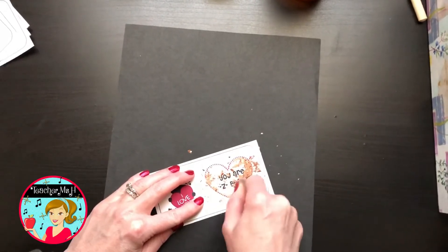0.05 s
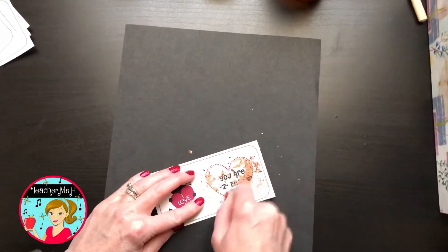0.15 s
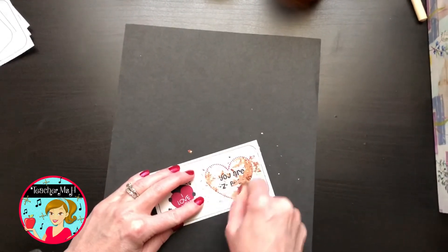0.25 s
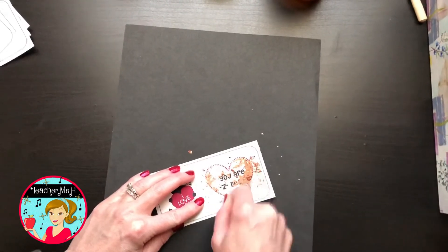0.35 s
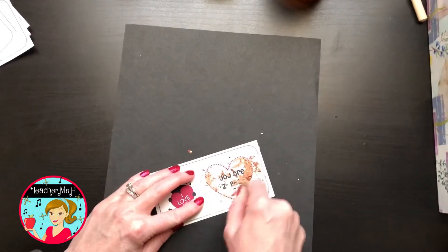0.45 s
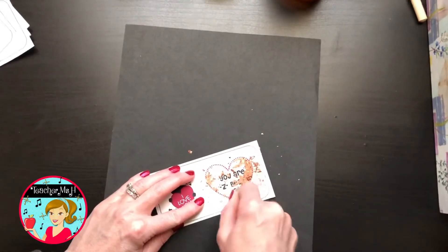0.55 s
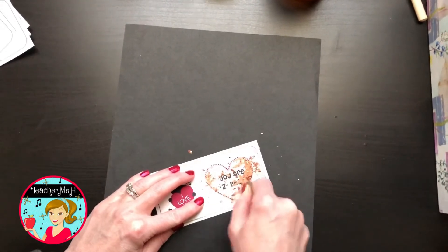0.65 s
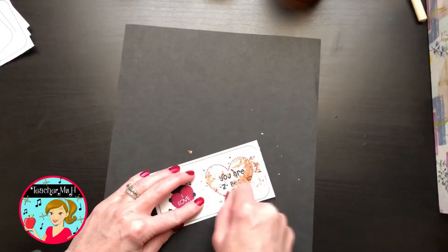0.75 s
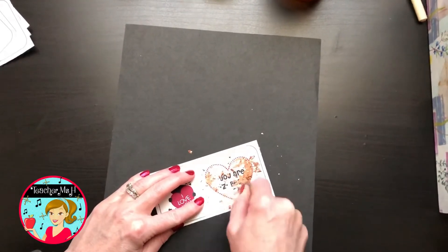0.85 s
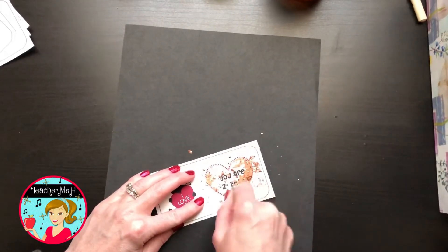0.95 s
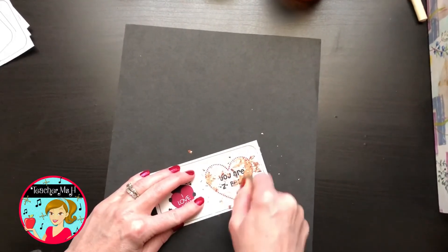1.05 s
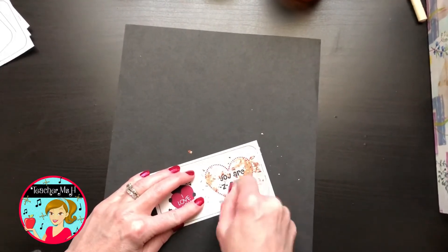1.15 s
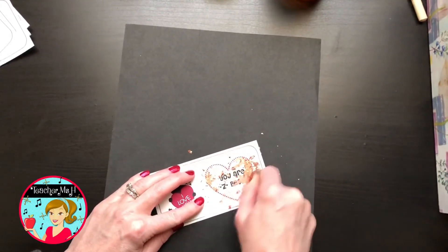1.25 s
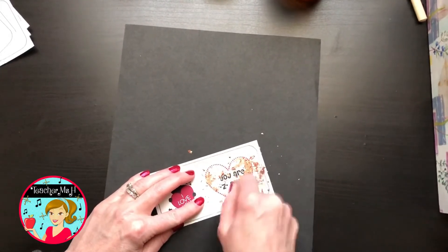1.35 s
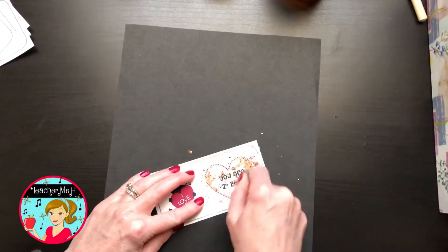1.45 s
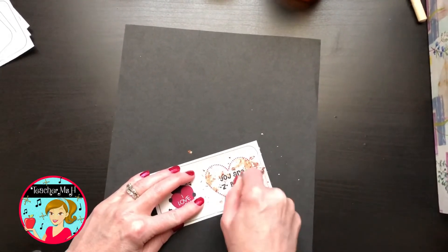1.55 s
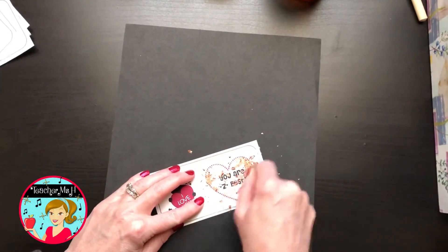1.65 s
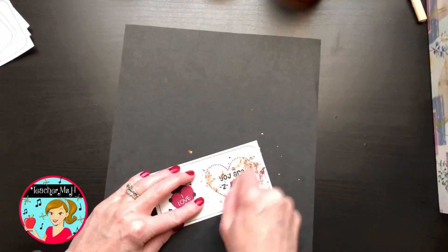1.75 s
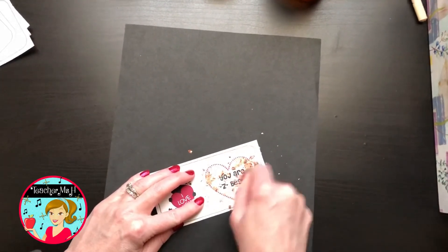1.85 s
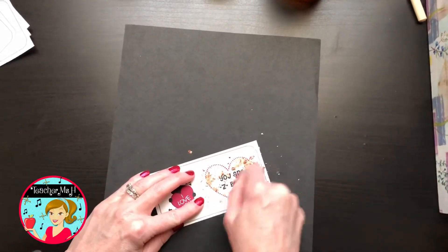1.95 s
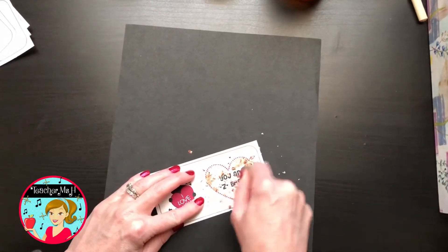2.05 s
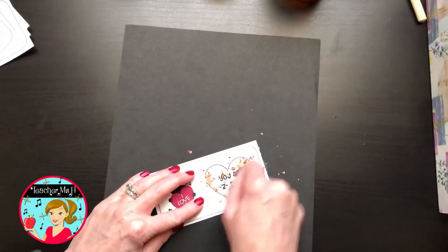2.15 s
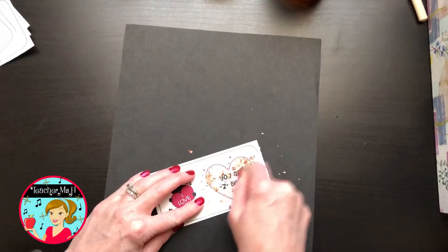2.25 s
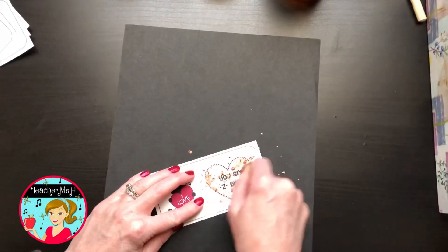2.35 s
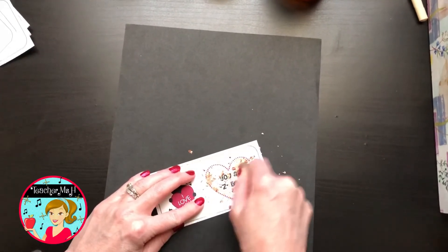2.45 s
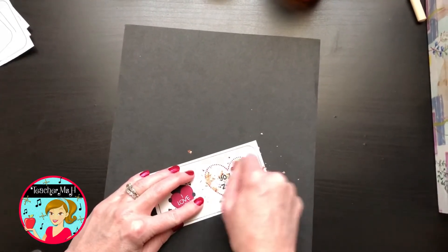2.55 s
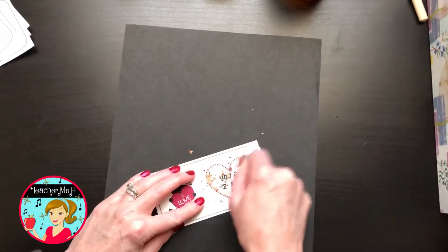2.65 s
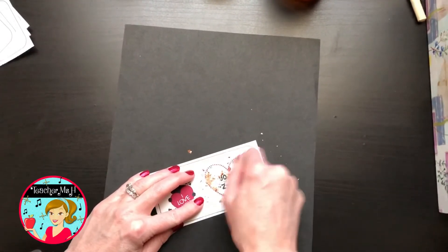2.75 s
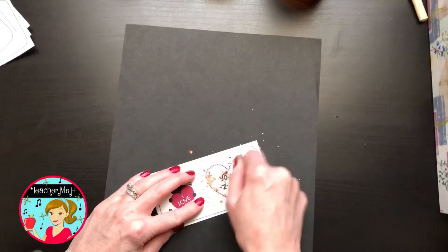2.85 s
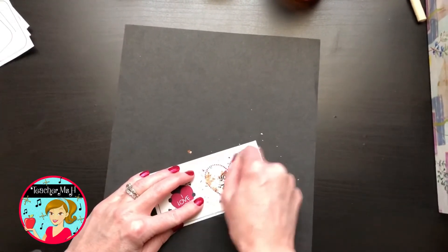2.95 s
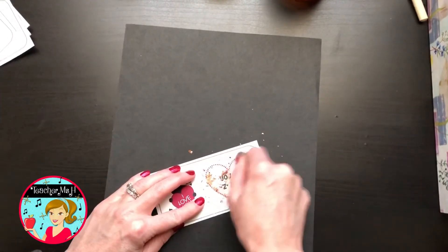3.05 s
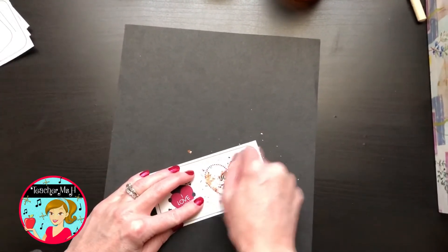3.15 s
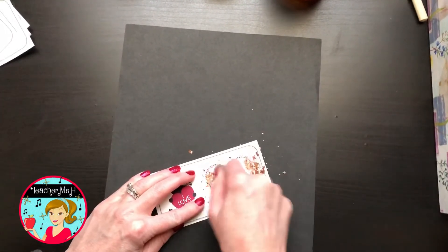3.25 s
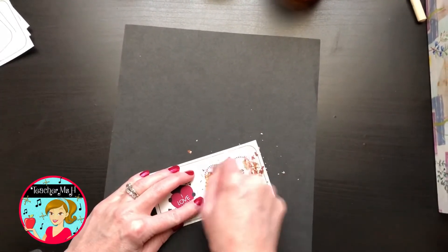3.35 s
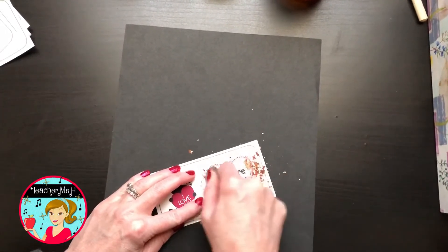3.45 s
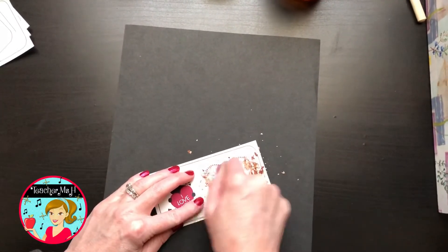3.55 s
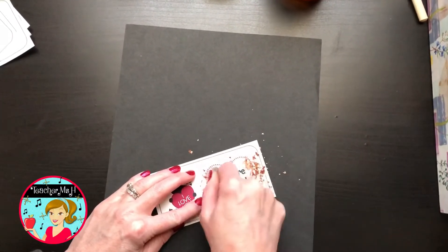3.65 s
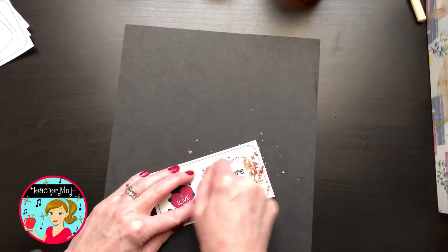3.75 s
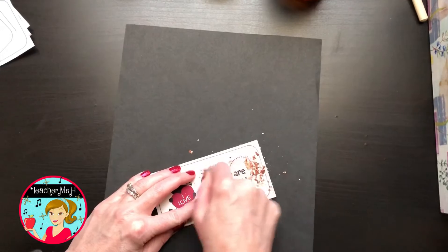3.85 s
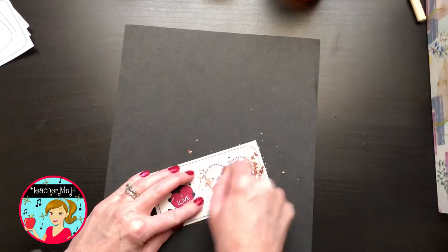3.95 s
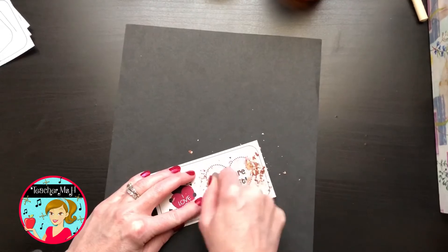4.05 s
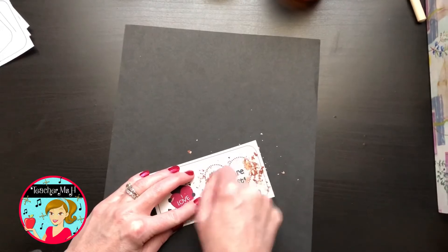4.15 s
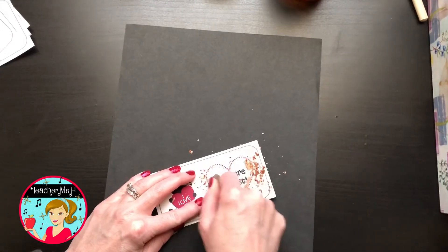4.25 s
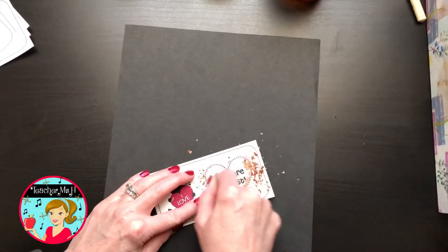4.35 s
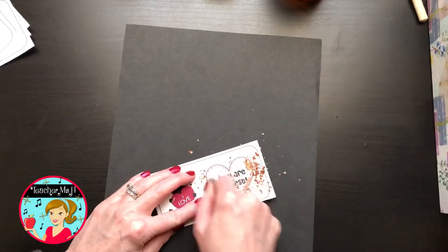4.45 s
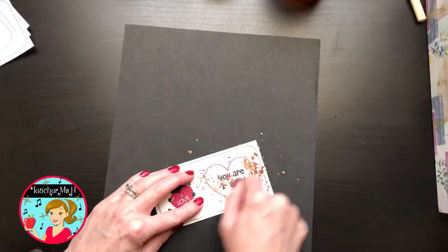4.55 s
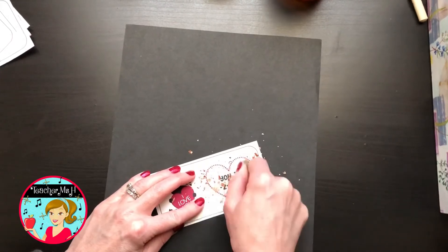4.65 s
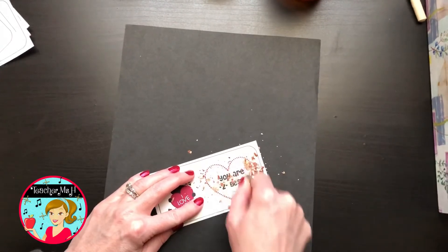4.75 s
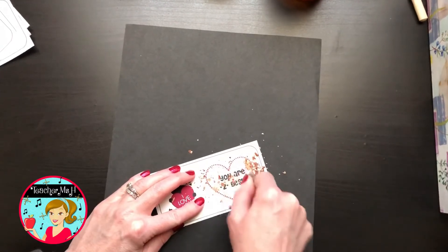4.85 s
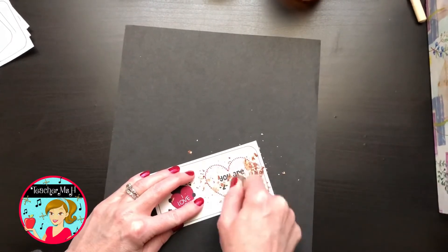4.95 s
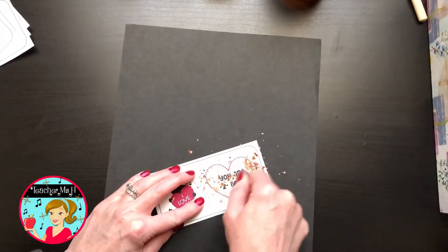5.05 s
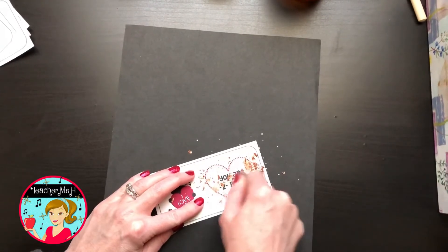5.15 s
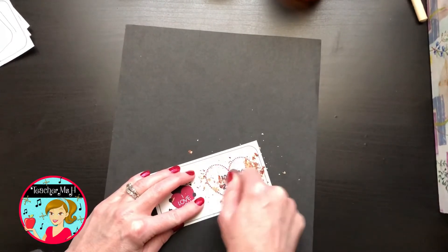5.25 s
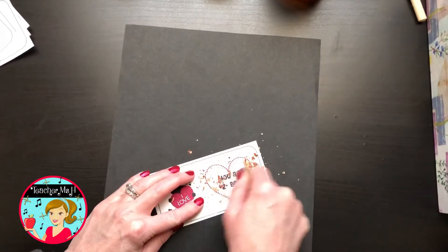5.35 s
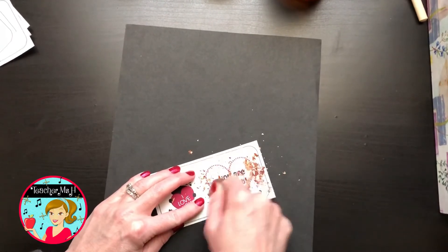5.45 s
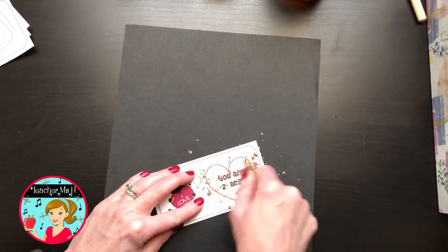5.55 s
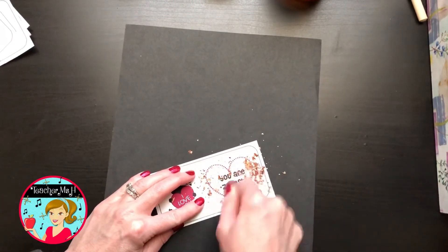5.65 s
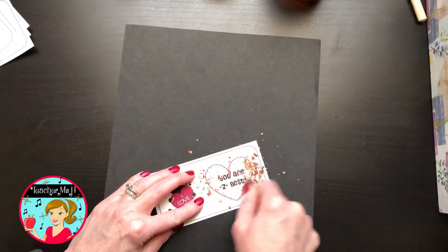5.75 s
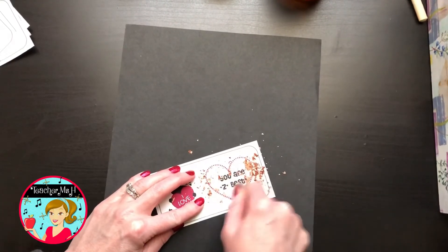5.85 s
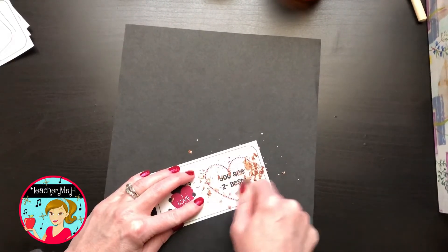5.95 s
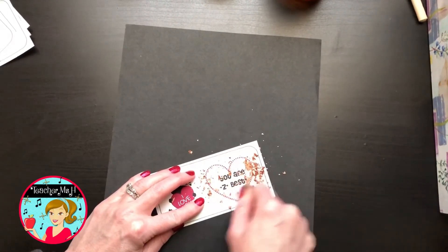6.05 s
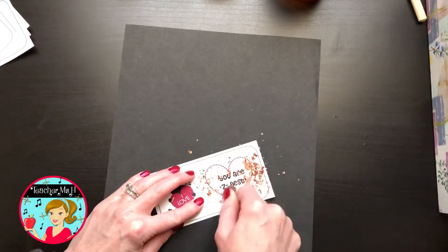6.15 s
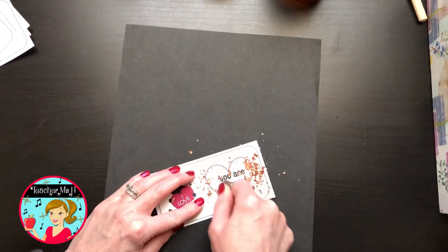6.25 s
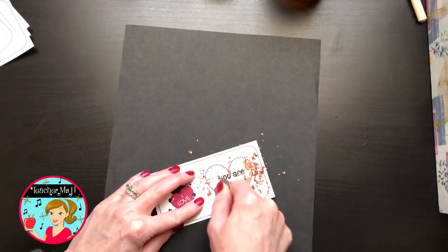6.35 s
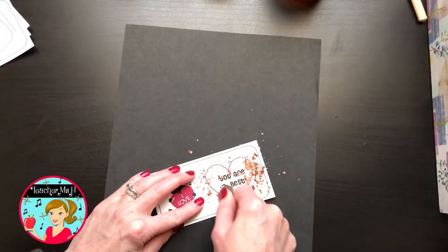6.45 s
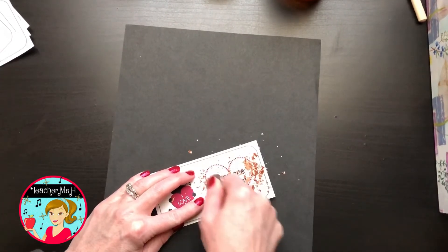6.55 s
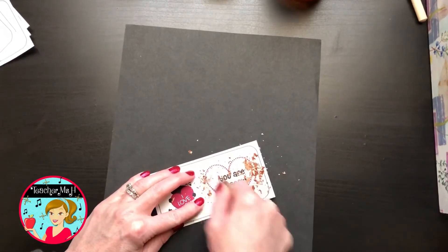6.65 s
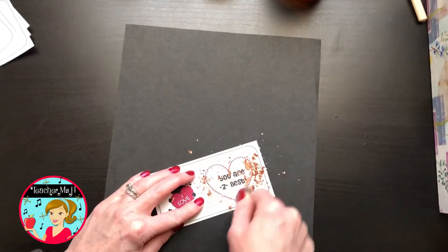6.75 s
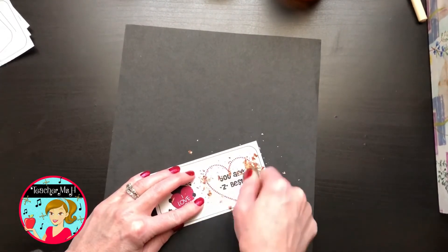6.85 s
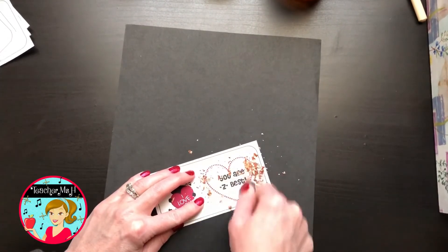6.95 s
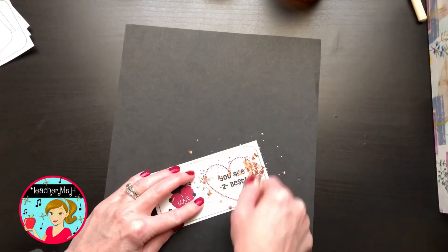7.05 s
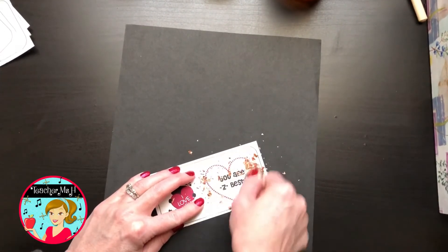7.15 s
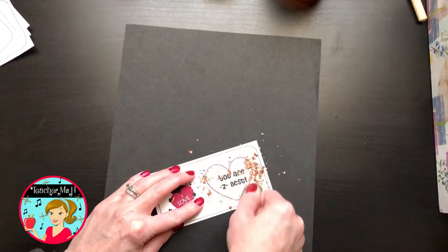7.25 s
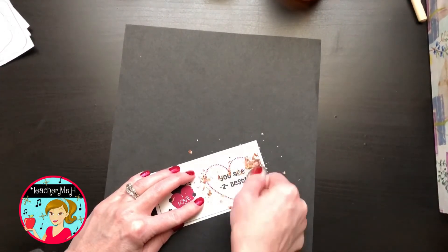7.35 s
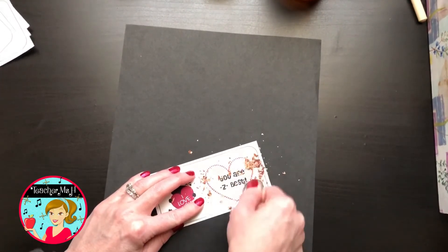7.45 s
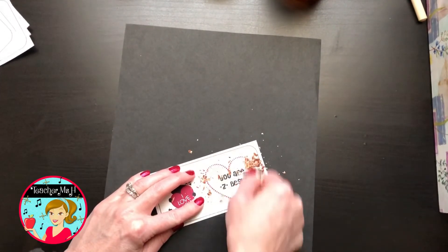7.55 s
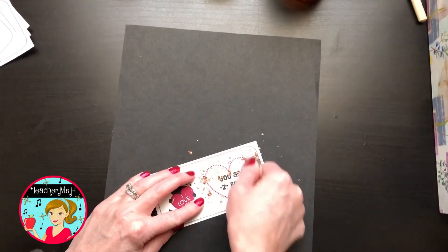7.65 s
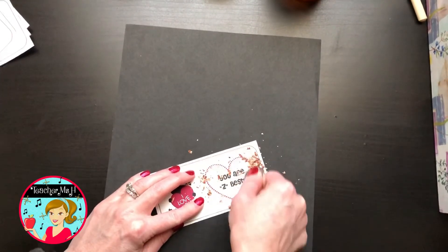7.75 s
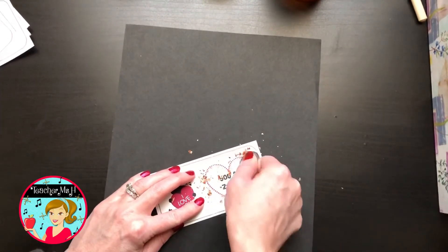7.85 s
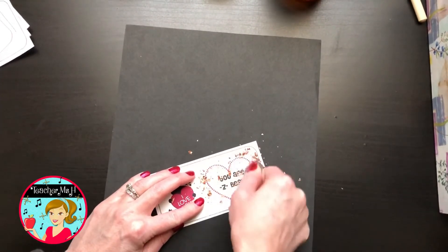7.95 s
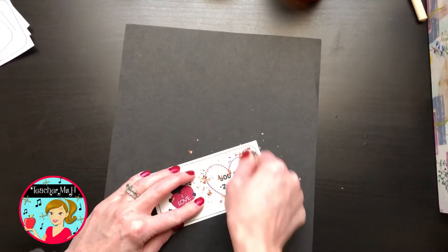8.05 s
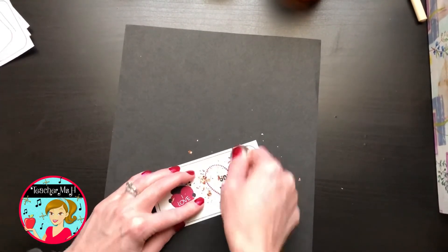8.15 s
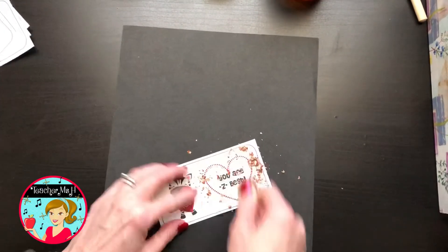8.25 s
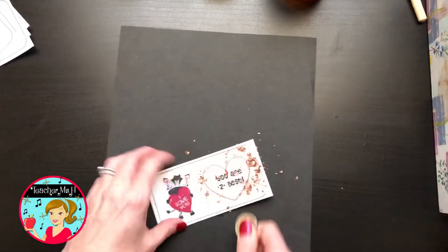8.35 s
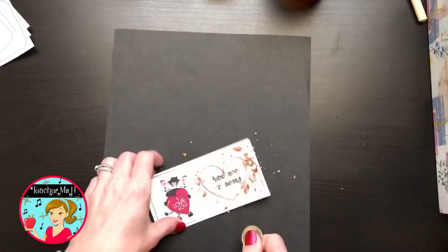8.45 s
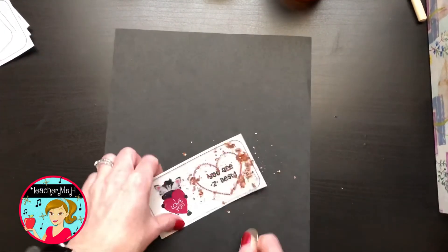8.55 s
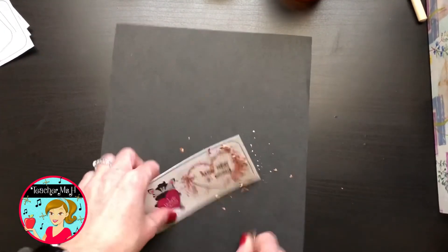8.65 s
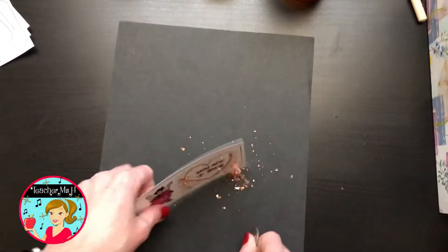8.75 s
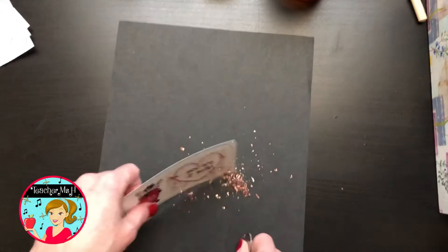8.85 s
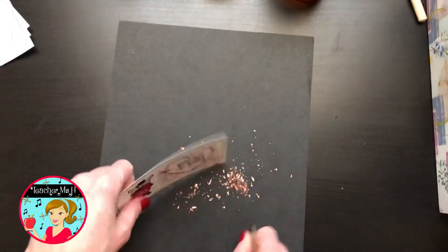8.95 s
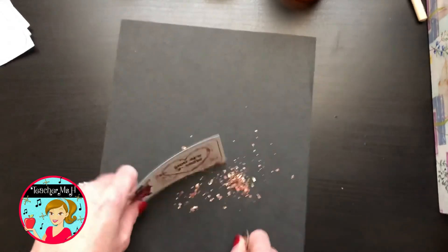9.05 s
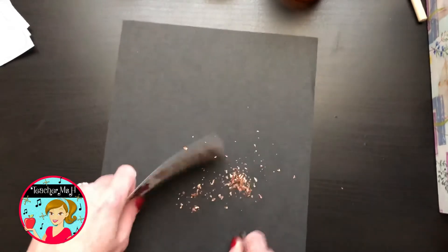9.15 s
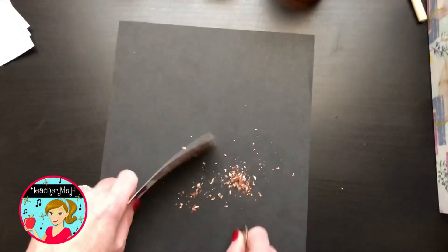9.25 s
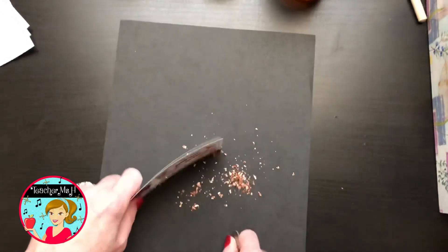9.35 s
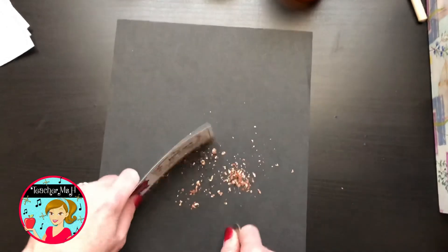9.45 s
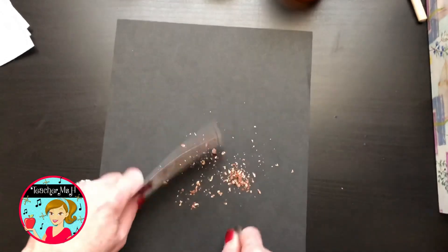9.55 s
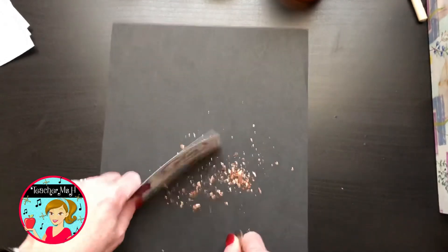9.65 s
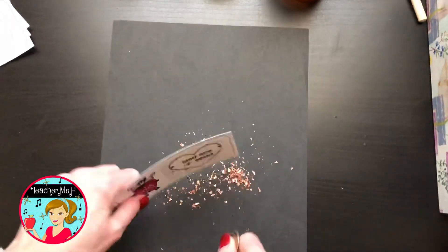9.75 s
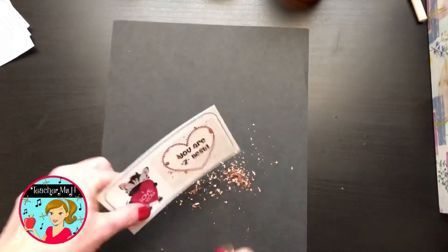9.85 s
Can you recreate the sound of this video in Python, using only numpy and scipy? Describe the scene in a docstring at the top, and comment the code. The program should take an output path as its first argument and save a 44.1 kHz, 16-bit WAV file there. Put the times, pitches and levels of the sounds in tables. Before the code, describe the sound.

Close up in a small quiet room, a coin rubs dried paint off a stiff paper card on a wooden desk, about nine raspy strokes a second, uneven and catching. The strokes grow softer and patchier, with dull hand thuds. Then the card slides up with a crackling hiss, its edge knocks the desk five times while crumbs patter, and one crisp flick follows before light sliding.

```python
"""A coin rubs dried paint off a paper card on a wooden desk, about nine strokes a second, catching on flakes.
Each stroke is filtered noise: a rasp in the card, a thump in the desk and fine grit at the coin's edge.
The card then slides up off the desk, a rub and a crackling hiss, and its edge is knocked on the desk five times
while crumbs of paint trickle off; it gets one last sharp flick, and a little more sliding follows.
A small room answers with a short noise tail, over steady air noise and a low hum."""
import sys
import numpy as np
from scipy import signal
from scipy.fft import rfft, irfft, next_fast_len
from scipy.io import wavfile
from scipy.ndimage import map_coordinates

SR = 44100
rng = np.random.default_rng(int(sys.argv[2]) if len(sys.argv) > 2 else 0)


def transcribe(u):
    """Save the signal u as a 16-bit wav file named by the first command-line argument.

    u: samples, shape (n,) or (channels, n), limited to [-1, 1]; the rate is SR.
    q: integer samples, one column per channel.
    """
    v = np.clip(np.atleast_2d(u).T, -1, 1)
    q = np.round(v * 32767).astype(np.int16)
    wavfile.write(sys.argv[1], SR, q)


N = 436574  # length in samples

# Resonances of the card held flat under the coin. Each row: pitch in Hz, width in Hz, boost in dB.
CARD = [(281, 98, 9.5), (419, 16, 7), (511, 20, 7.5), (634, 56, 10.5), (891, 180, 9.5), (1252, 68, 6.5),
        (1635, 170, 3), (1740, 70, 7.5), (2078, 125, 9.5), (2543, 176, 11), (2932, 146, 11.5),
        (3600, 130, 5), (4410, 300, 0)]
# Tone of the rasp in the card. Each row: frequency in Hz, relative level in dB.
RASP = [(100, -22.5), (190, -4), (270, 0.5), (450, -1.5), (750, -7.5), (1000, -3.5), (1400, -2),
        (1900, -12.5), (2600, -19), (3300, -26.5), (5000, -28), (7000, -49)]
# Tone of fine paint grit and cracks. Each row: frequency in Hz, relative level in dB.
GRIT = [(1500, -32), (3000, -6), (4600, -2), (7000, -6), (10000, -9), (16000, -12.5)]
# Tone of paper hiss and crackle. Each row: frequency in Hz, relative level in dB.
HISS = [(1470, -16), (2500, -4), (3740, -6.5), (4990, -5.5), (8270, -12), (9730, -12), (14800, -12),
        (16000, -19)]


def amp(db):
    """Turn decibels into a plain gain."""
    return 10 ** (np.asarray(db) / 20)


def unit(x):
    """Scale a steady sound to an average (rms) level of 1."""
    return x / np.sqrt(np.mean(x ** 2) + 1e-20)


def unit_energy(x):
    """Scale a short sound to a total energy of 1."""
    return x / np.sqrt(np.sum(x ** 2) + 1e-20)


def seconds(size):
    """Time of each sample."""
    return np.arange(size) / SR


def along(points, hz):
    """Read a curve of (Hz, value) points on a log frequency axis."""
    f, v = np.transpose(points)
    return np.interp(np.log(hz + 1), np.log(f + 1), v)


def add(track, s, x):
    """Mix x into the track from time s on."""
    i = round(s * SR)
    part = x[max(-i, 0):max(len(track) - i, 0)]
    track[max(i, 0):][:len(part)] += part


def colour(x, points, tilt_db=0, modes=()):
    """Filter through (Hz, dB) points, plus a tilt in dB per octave (450-3000 Hz) and (Hz, width, dB) resonances."""
    m = 2 * next_fast_len(len(x) // 2 + 2048)
    hz = np.fft.rfftfreq(m, 1 / SR)
    peaks = sum(db / (1 + (2 * (hz - centre) / width) ** 2) for centre, width, db in modes)
    gain = amp(along(points, hz) + peaks + tilt_db * np.log2(np.clip(hz, 450, 3000)))
    # folding the cepstrum makes the filter answer only after its input, never before
    cepstrum = irfft(np.log(np.maximum(gain / gain.max(), 1e-6)))
    cepstrum[1:m // 2] *= 2
    cepstrum[m // 2 + 1:] = 0
    response = np.exp(rfft(cepstrum))
    return irfft(rfft(x, m) * response)[:len(x)]


def burst(t60, attack):
    """Noise that swells within about attack seconds while it dies by 60 dB in t60 seconds."""
    t = seconds(SR // 4)
    return rng.standard_normal(len(t)) * amp(-60 * t / t60) * (1 - np.exp(-t / attack))


def grains(size, rate, spread_db):
    """Tiny fractures at random times, rate a second, of widely spread size with an upper limit on the spread."""
    hit = rng.random(size) < rate / SR
    return hit * rng.standard_normal(size) * amp(spread_db * np.minimum(rng.standard_normal(size), 2))


def swell(t, rise, fall):
    """Speed of a sliding stroke: a smooth hump with its peak at t = 0."""
    width = np.maximum(np.where(t < 0, rise, fall), .004)
    return np.exp(-(np.abs(t) / width) ** 2.04)


def judder(size, rate, depth_db):
    """Uneven grip: a gain that wanders between random values, rate of them a second."""
    knots = rng.standard_normal(size)[:int(size * rate / SR) + 4]
    wander = map_coordinates(knots, [seconds(size) * rate])
    return unit(amp(depth_db * wander))


def bump(hz, rattle_db):
    """A soft blow rings one damped bending mode, with a little rattle around it."""
    t = seconds(SR // 4)
    ring = unit_energy(np.sin(2 * np.pi * hz * t) * amp(-60 * t / 0.047) * (1 - np.exp(-t / .004)))
    band = [(hz / 4, -22), (hz / 1.35, -5), (hz, 0), (hz * 1.18, -5), (hz * 3, -30), (hz * 12, -70)]
    rattle = unit_energy(colour(burst(t60=0.093, attack=.002), band))
    return ring + amp(rattle_db) * rattle


def shifted(modes):
    """The same resonances, scattered a little in pitch as the coin moves along the card from stroke to stroke."""
    detune = .025  # typical scatter, as a share of the pitch
    modes = np.array(modes, float)
    scatter = rng.standard_normal(len(modes))
    return [(hz * np.exp(detune * z), width, db) for (hz, width, db), z in zip(modes, scatter)]


def background():
    """Room air and a low, narrow hum, both made of steady filtered noise."""
    # Tone of the air noise. Each row: frequency in Hz, relative level in dB.
    air_tone = [(10, -48), (25, -24), (42, -19), (108, 1.5), (166, -8.5), (309, -8), (463, -12.5),
                (911, -15.5), (1650, -20.5), (2100, -24), (2500, -27.5), (3250, -32), (4490, -33),
                (16000, -47.5)]
    # Tone of the hum. Each row: frequency in Hz, relative level in dB.
    hum_tone = [(25, -16.5), (40, -15.5), (51, 8), (63, -24), (78, -12), (105, -1), (125, -8), (160, -25.5),
                (400, -60)]
    air = unit(colour(rng.standard_normal(N), air_tone))
    hum = unit(colour(rng.standard_normal(N), hum_tone))
    return amp(-58.5) * air + amp(-57.5) * hum


def scraping():
    """Each stroke breaks paint grains: a rasp in the card, a thump in the desk and fine grit at the coin's edge."""
    # Coin strokes, to and fro. Each row: time of full speed in seconds, rise in seconds, relative rasp level in dB,
    # bite as rasp tilt in dB per octave (above 0 the edge digs in, below 0 the coin drags flat).
    strokes = [(.07, 0.015, -45, 2.5), (.168, .029, -39, 1.5), (.263, 0.019, -41.5, 2.5),
               (.376, .017, -42, 2), (.468, 0.049, -53.5, 1.5), (.56, .022, -50.5, 3),
               (.652, 0.022, -44, 0.5), (.756, 0.017, -47, 0.5), (.855, 0.022, -47.5, -0.5),
               (.985, 0.034, -45.5, 2), (1.054, .004, -38.5, -4.5), (1.171, 0.023, -38, 3.5),
               (1.268, 0.024, -41, -1.5), (1.373, .027, -45.5, 0), (1.578, 0.032, -39.5, 1.5),
               (1.668, .03, -40, -0.5), (1.797, 0.076, -48.5, 2.5), (1.887, 0.025, -41.5, 0.5),
               (1.991, 0.02, -43, 0.5), (2.1, 0.0097, -40, -4), (2.19, 0.035, -50, 0.5),
               (2.233, .004, -42.5, -2), (2.299, .022, -44, -3.5), (2.41, 0.023, -51.5, 2),
               (2.485, 0.016, -43, -4.5), (2.589, 0.032, -40.5, 1.5), (2.688, 0.024, -38, -1.5),
               (2.809, 0.026, -48.5, 2.5), (2.881, 0.0057, -43, 2), (2.995, .031, -50, 2),
               (3.121, 0.04, -37, -3), (3.215, .021, -49, -0.5), (3.298, 0.02, -40.5, -3),
               (3.42, 0.0055, -40.5, 0), (3.513, 0.018, -45, -5), (3.7, .009, -42, -7),
               (3.832, 0.037, -44, 2), (3.928, 0.039, -40, -1), (4.025, 0.042, -54.5, 2),
               (4.096, 0.013, -41.5, -2), (4.22, .05, -61, 1), (4.326, .04, -55.5, -3.5),
               (4.44, 0.034, -44.5, 2.5), (4.5, 0.041, -51.5, 2.5), (4.555, .03, -54, 1.5),
               (4.72, 0.072, -55.5, 2.5), (4.854, 0.036, -45.5, -4.5), (4.98, 0.07, -56, 7.5),
               (5.116, 0.026, -44, -3.5), (5.226, .035, -52, 1), (5.337, 0.03, -36, -3),
               (5.456, 0.059, -46, 2), (5.558, 0.015, -39, -3.5), (5.687, .042, -45, 5),
               (5.772, 0.017, -37.5, -2.5), (5.911, 0.061, -50.5, 2), (6.001, 0.024, -39.5, -2),
               (6.202, 0.045, -52, -1.5), (6.46, .036, -47, -1), (6.636, 0.06, -50, 4.5),
               (6.75, 0.048, -57.5, 4), (6.885, 0.043, -56.5, 4), (7.02, 0.059, -55, 1.5),
               (7.132, 0.017, -45, 6.5), (7.255, 0.049, -44, 3), (7.505, .051, -47.5, 0),
               (7.621, .03, -53.5, 1), (7.755, 0.056, -51.5, 0), (7.837, .019, -58, 5.5),
               (7.968, .022, -46, -1.2), (8.01, 0.011, -51.5, 2)]
    # The card's free span changes as the coin travels. Each row: time in seconds, drone pitch in Hz.
    drone_pitch = [(0, 970), (1.1, 1006), (2.1, 980), (3.1, 900), (4.1, 947), (4.85, 950), (5.4, 1070),
                   (6, 1130), (8, 885)]
    # Tone of the desk's thump. Each row: frequency in Hz, relative level in dB.
    thump_tone = [(50, -28), (80, -17.5), (105, -1.5), (150, -12), (260, -12), (400, -23.5), (800, -65.5)]
    # Bright resonances of coin and card. Each row: pitch in Hz, width in Hz, boost in dB.
    rim = [(2550, 90, 5), (2920, 34, 11), (3570, 210, 13.5), (4060, 170, 6), (4540, 100, 10),
           (5870, 150, 4), (6950, 130, 5), (9400, 97, 10), (12000, 120, -17.5)]
    fall_s = .028  # the coin brakes alike at the end of every stroke
    usual_db = -45.5  # rasp of an ordinary stroke
    full_bite = 3.2  # the edge is through the paint: no more grit beyond this
    landing_lead_s = 0.00401  # the coin touches down just before it starts to drag
    landing_db, landing_rattle_db = 18, 2.5  # ring energy re the rasp level, rattle re the ring
    out, size = np.zeros(N), 2 * SR // 3
    t = seconds(size) - size / SR / 2
    for s, rise, db, bite in strokes:
        speed = swell(t, rise, fall_s)
        grip = judder(size, rate=170, depth_db=2.5)
        # a biting edge throws more grit, a flat coin shakes the desk more
        thump_db = -51.5 + 0.34 * (db - usual_db) - 0.9 * bite
        grit_db = -65 + 0.86 * (db - usual_db) + 1.52 * min(bite, full_bite)
        # the flatter the coin drags, the more the card drones near one pitch
        drone_hz = np.interp(s, *np.transpose(drone_pitch))
        drone = (drone_hz, 520, 1.25 + 2 * max(-bite, 0))
        fractures = grip * grains(size, rate=7000, spread_db=2.5)
        rasp = unit(colour(fractures, RASP, bite, shifted(CARD) + [drone]))
        thump = unit(colour(rng.standard_normal(size), thump_tone))
        # hard specks in the paint make the grit spit
        specks = judder(size, rate=400, depth_db=4.5)
        spray = grip * specks * grains(size, rate=9000, spread_db=2.5)
        grit = unit(colour(spray, GRIT, modes=shifted(rim)))
        add(out, s + t[0], speed * (amp(db) * rasp + amp(thump_db) * thump + amp(grit_db) * grit))
        # a flat stroke starts with the coin landing on the card
        if bite < -.5:
            landing = bump(drone_hz, landing_rattle_db)
            add(out, s - rise - landing_lead_s, amp(db + landing_db) * landing)
    return out


def desk_scatter(x):
    """Treble bounces off the desk and nearby things, which combs it into fine steady lines."""
    tone = [(500, -34.5), (1800, -0.5), (16000, 6.0)]
    paths = unit_energy(colour(burst(t60=0.014, attack=0.0013), tone))
    return x + amp(-5.0) * signal.fftconvolve(x, paths)[:N]


def room_tail():
    """Diffuse answer of the room: noise in which each frequency dies at its own speed."""
    # How long the room rings. Each row: frequency in Hz, time to fall by 60 dB in seconds.
    ring_times = [(100, 0.43), (400, 0.33), (1500, 0.43), (4000, 0.33), (12000, 0.32)]
    hz, t, z = signal.stft(rng.standard_normal(SR // 2), SR, nperseg=256)
    fading = z * amp(-60 * t / along(ring_times, hz)[:, None])
    tail = signal.istft(fading, SR, nperseg=256)[1][:SR // 2]
    return unit_energy(tail * (1 - np.exp(-seconds(len(tail)) / 0.0045)))


def small_contacts():
    """Short bursts for catching and snapping free, ringing bumps of the hand, and thin bright ticks."""
    # The coin or the card catches and snaps free.
    # Each row: start in seconds, relative crack energy in dB, relative body energy in dB.
    snaps = [(0.073, -28.5, -37), (2.0906, -33.5, -27), (2.2205, -33, -14.5), (2.7933, -32, -22),
             (3.223, -40, -26), (3.325, -41, -21), (3.4201, -26, -17.5), (3.6973, -31.5, -20.5),
             (4.8553, -34.5, -33), (6.977, -33, -29), (7.029, -31, -25), (7.3746, -25.5, -13),
             (7.504, -27.5, -24), (7.617, -50, -22), (8.3942, -34, -24.5), (8.6916, -34, -37),
             (9.2093, -23, -28.5), (9.3691, -32, -16.5)]
    # Dull bumps as the hand shifts on the card. Each row: start in seconds, relative ring energy in dB.
    bumps = [(5.035, -23), (6.328, -16), (6.922, -23.5), (8.395, -17), (8.42, -17.5)]
    # Thin ticks of coin and fingernails. Each row: start in seconds, relative energy in dB, pitch in Hz.
    ticks = [(3.63, -24.5, 7200), (3.65, -33, 9900), (6.7213, -34.5, 11600), (8.2795, -27.5, 14600),
             (8.3514, -23, 8400)]
    out = np.zeros(N)
    for s, crack_db, body_db in snaps:
        crack = unit_energy(colour(burst(t60=0.022, attack=0.00057), GRIT))
        body = unit_energy(colour(burst(t60=0.028, attack=0.0027), RASP, tilt_db=5.0, modes=CARD))
        add(out, s, amp(crack_db) * crack + amp(body_db) * body)
    for s, db in bumps:
        add(out, s, amp(db) * bump(hz=332, rattle_db=-5))
    for s, db, hz in ticks:
        tick = colour(burst(t60=0.018, attack=0.00025), GRIT, tilt_db=7.0, modes=[(hz, 2600, 17)])
        add(out, s, amp(db) * unit_energy(tick))
    return out


def skimming():
    """A light touch on paper whispers fitfully around one pitch."""
    # The side of the hand or the card's edge skims the paper.
    # Each row: middle in seconds, half length in seconds, relative level in dB, pitch in Hz.
    skims = [(1.04, 0.011, -61, 4470), (1.267, .09, -70, 4720), (3.88, .035, -76, 7200),
             (4.787, 0.3, -72, 2160), (4.924, .11, -72, 4240), (6.378, 0.081, -72, 4250),
             (6.394, 0.086, -79.5, 7150), (6.56, .1, -79, 9400), (8.452, 0.0078, -44.5, 3400),
             (8.496, .038, -61, 5660), (9.874, 0.063, -65.5, 6700)]
    out, size = np.zeros(N), SR
    t = seconds(size) - size / SR / 2
    for s, length, db, hz in skims:
        # keep this order: the level climbs to the pitch, steps up there and falls away above
        band = [(hz / 4, -80), (hz / 0.9, -10), (hz, 0), (hz * 1.0, -11), (hz * 4, -80)]
        touch = judder(size, rate=40, depth_db=5.0) * rng.standard_normal(size)
        whisper = unit(colour(touch, band))
        add(out, s + t[0], amp(db) * swell(t, length, length) * whisper)
    return out


def thuds():
    """The heel of the hand presses and rolls, and its weight sets the desk booming for a moment."""
    # Presses of the hand. Each row: middle in seconds, relative level in dB.
    presses = [(5.125, -44), (6.215, -46), (6.485, -43.5), (7.045, -47.5), (7.27, -44.5), (7.52, -49)]
    # Tone of the desk under the hand. Each row: frequency in Hz, relative level in dB.
    boom_tone = [(60, -26), (90, -8), (112, 4.5), (140, -7.5), (200, -17), (500, -54.5)]
    half_s = 0.025  # half length of a thud
    out, size = np.zeros(N), SR // 3
    t = seconds(size) - size / SR / 2
    for s, db in presses:
        boom = unit(colour(rng.standard_normal(size), boom_tone))
        add(out, s + t[0], amp(db) * swell(t, half_s, half_s) * boom)
    return out


def sliding():
    """Paper on paper: a soft rub under a hiss that breaks up into crackles, with more or less top sheen."""
    # Card and fingers sliding over paper. Each row: middle in seconds, rise in seconds, fall in seconds,
    # relative rub level in dB, relative hiss level in dB, top sheen in dB.
    slides = [(8.176, .023, 0.024, -46, -51.5, 0), (8.25, 0.093, .083, -54.5, -60, -3),
              (8.33, 0.016, .036, -41.5, -53, 6), (8.45, 0.057, .021, -50, -55, -12),
              (8.535, .07, 0.073, -59.5, -54.5, -10), (8.614, 0.035, 0.023, -46, -45, 2),
              (9.577, 0.012, .013, -51, -45.5, -7), (9.79, 0.21, 0.18, -57, -71, 1)]
    # Tone of the rub. Each row: frequency in Hz, relative level in dB.
    rub_tone = [(71, -47), (120, -21), (265, 0), (361, 2), (406, -0.5), (978, -9), (1150, -1.5),
                (1270, -8.5), (4000, -25.5), (5200, -41), (8800, -120)]
    out, size = np.zeros(N), SR // 2
    t = seconds(size) - size / SR / 2
    for s, rise, fall, rub_db, hiss_db, sheen_db in slides:
        friction = judder(size, rate=83, depth_db=1) * rng.standard_normal(size)
        rub = unit(colour(friction, rub_tone))
        fibres = judder(size, rate=160, depth_db=2.5) * grains(size, rate=5500, spread_db=4.5)
        hiss = unit(colour(fibres, HISS, modes=[(13000, 21000, sheen_db)]))
        add(out, s + t[0], swell(t, rise, fall) * (amp(rub_db) * rub + amp(hiss_db) * hiss))
    return out


def disperse(x, delay_s):
    """Bending waves: treble runs ahead, bass lags; the net delay is half of delay_s at 1 kHz and 0 at 4 kHz."""
    hz = np.fft.rfftfreq(len(x), 1 / SR)
    cycles = delay_s * (2 * np.sqrt(1000 * hz) - hz / 2)
    return irfft(rfft(x) * np.exp(-2j * np.pi * cycles), len(x))


def tapping():
    """The card's edge strikes the same spot each time; gives the near sound and the sound sent into the room."""
    # The card's edge hits the desk. Each row: start in seconds, relative energy in dB,
    # contact cut-off in Hz, paper crackle in dB relative to the knock.
    taps = [(8.5902, 12.5, 2400, -28.5), (8.7376, 12, 2040, -30.5), (8.9202, 12.5, 2100, -28.5),
            (9.0962, 13.5, 2870, -31), (9.2735, 14.5, 2930, -32)]
    # Tone of the near knock. Each row: frequency in Hz, relative level in dB.
    knock_tone = [(30, -82), (60, -31), (120, -20), (250, -11), (500, -14.5), (800, -10), (1250, 4),
                  (1800, -11.5), (2500, -4), (3300, -11), (6000, -11), (16000, -31)]
    # Resonances of the card standing on the desk. Each row: pitch in Hz, width in Hz, boost in dB.
    desk_modes = [(109.5, 31, 15), (315, 133, 12.5), (398, 56, 8.5), (499.5, 46, 17), (628, 94, 17.5),
                  (774, 20, 10.5), (870, 110, 3.5), (1050, 34, 2.5), (1203, 103, 6), (1360, 25, 1.5),
                  (1580, 103, 7.5), (1750, 130, 11), (1827, 133, 12.5), (2060, 110, 10)]
    # Tone of a tap averaged over all directions. Each row: frequency in Hz, relative level in dB.
    spread_tone = [(30, -50), (120, -16), (300, -8.5), (500, -1), (800, -3.5), (1250, -3), (1750, -2.5),
                   (2300, -9), (3000, -15), (4000, -17), (16000, -31)]
    # one corner touches first, the whole edge slaps down a moment later and rebounds ever more weakly
    contact, lag_s, corner = np.zeros(SR // 4), .0023, .36
    contact[0] = corner
    for k in range(5):
        contact[round((k + 1) * lag_s * SR)] = (1 - corner ** 2) * (-corner) ** k
    near, sent = np.zeros(N), np.zeros(N)
    lead = SR // 50  # samples of silence that leave room for the early treble
    for s, db, contact_hz, crackle_db in taps:
        size = amp(db)
        # a firmer contact is brighter
        softness = signal.butter(4, contact_hz, fs=SR, output="sos")
        # the flexing card flutters on after the blow
        flutter = unit_energy(burst(t60=0.07, attack=0.0035))
        blow = colour(contact + amp(-7.0) * flutter, knock_tone, modes=desk_modes)
        blow = signal.sosfilt(softness, blow)
        knock = unit_energy(disperse(np.pad(blow, lead), delay_s=0.001404))
        crackle = unit_energy(colour(burst(t60=0.07, attack=0.00021), HISS))
        add(near, s - lead / SR, size * knock)
        add(near, s, size * amp(crackle_db) * crackle)
        add(sent, s, size * unit_energy(signal.sosfilt(softness, colour(contact, spread_tone))))
    return near, sent


def crumbs():
    """Loose paint trickles off the card between the knocks, as a patter of tiny random grains."""
    # The trickle's loudness. Each row: time in seconds, relative level in dB.
    trickle_levels = [(8.66, -66), (8.948, -62.5), (9.178, -69), (9.294, -63), (9.47, -74)]
    t = seconds(N)
    s, db = np.transpose(trickle_levels)
    # full between the first and last times, fading at both ends
    falling = swell(t - np.clip(t, s[0], s[-1]), .04, .02)
    trickle = unit(colour(grains(N, rate=3600, spread_db=5), HISS, modes=[(12000, 9000, 2)]))
    return amp(np.interp(t, s, db) + 1) * falling * trickle


def flick():
    """The bent card springs loose with a short bright flutter."""
    # Tone of the flick. Each row: frequency in Hz, relative level in dB.
    flick_tone = [(60, -31), (110, -9), (290, -15), (410, -6.5), (700, -9.5), (1000, 0), (1400, -9),
                  (1900, -6), (2900, -5), (4400, -16), (5500, -14.5), (8300, -32.5), (16000, -30)]
    start_s = 9.4938
    out = np.zeros(N)
    flutter = unit_energy(colour(burst(t60=0.06, attack=0.00079), flick_tone))
    add(out, start_s, amp(7.5) * flutter)
    return out


def scene():
    """The near sounds, the room's answer to them and the steady background."""
    touches = scraping() + thuds() + sliding() + skimming() + crumbs() + small_contacts()
    coin = amp(-.5) * desk_scatter(touches)
    taps, taps_sent = tapping()
    snap = flick()
    sent = amp(-11.0) * coin + amp(-10.5) * taps_sent + amp(-11.0) * snap
    room = signal.fftconvolve(sent, room_tail())[:N]
    return (coin + taps + snap + room + background())[None]


def record(dry):
    """Cut everything from the upper band limit on."""
    top_hz = 16100
    m = next_fast_len(N + SR // 2)
    keep_band = np.fft.rfftfreq(m, 1 / SR) < top_hz
    return irfft(rfft(dry, m) * keep_band, m)[..., :N]


dry = scene()
out = record(dry)
transcribe(out)
```